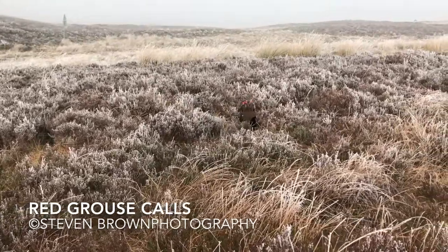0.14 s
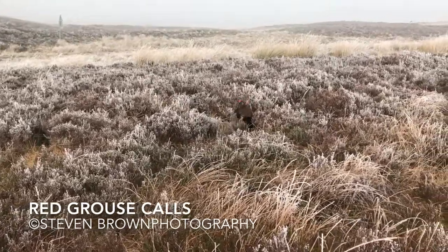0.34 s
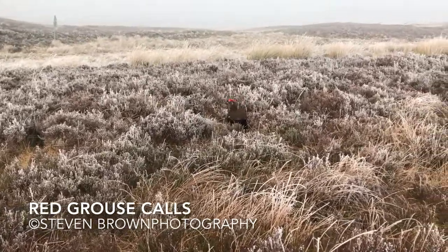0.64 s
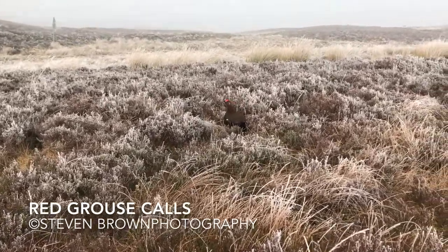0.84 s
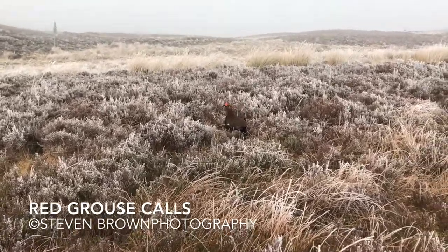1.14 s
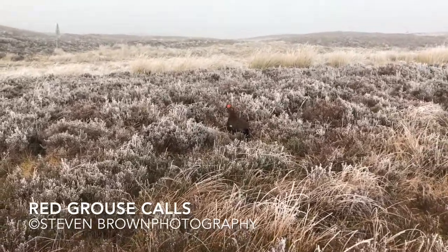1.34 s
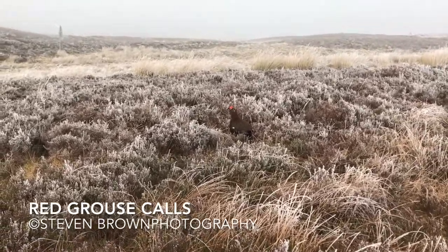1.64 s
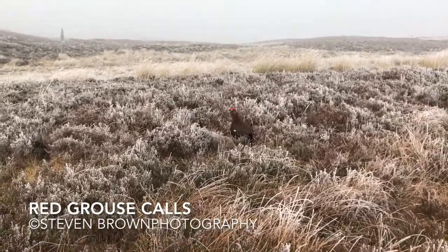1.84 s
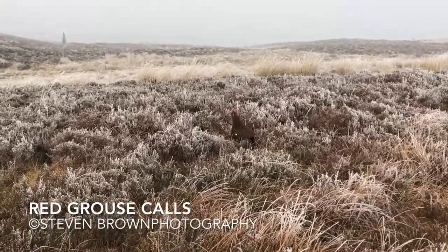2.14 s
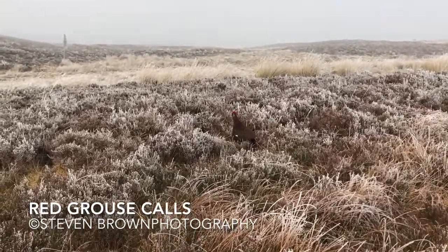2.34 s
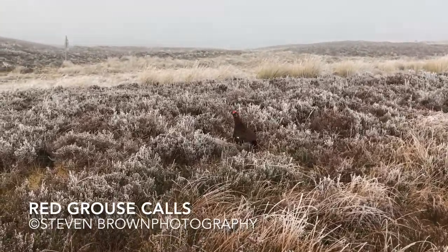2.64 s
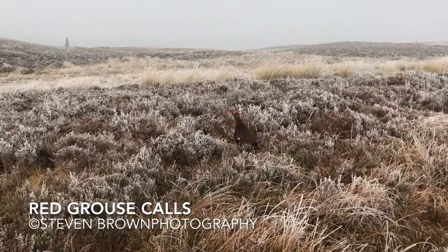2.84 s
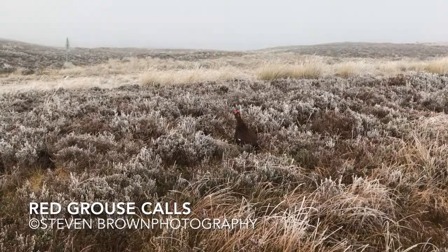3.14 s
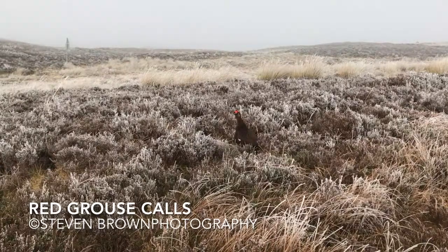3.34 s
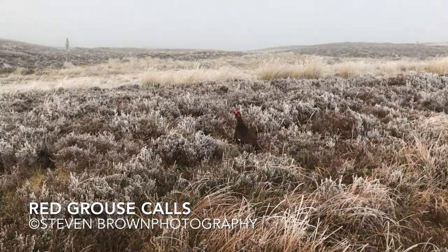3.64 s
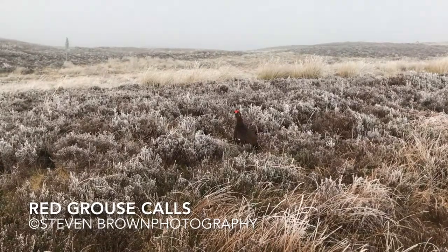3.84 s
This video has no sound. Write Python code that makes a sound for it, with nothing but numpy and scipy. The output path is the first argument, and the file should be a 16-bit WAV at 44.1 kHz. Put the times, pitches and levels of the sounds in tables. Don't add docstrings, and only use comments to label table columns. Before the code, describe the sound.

Harsh grouse croaks with low growls speed up into a rapid rattle, over faint moorland wind.

```python
import sys
import numpy as np
from scipy import signal
from scipy.fft import rfft, irfft, next_fast_len
from scipy.io import wavfile
from scipy.ndimage import uniform_filter1d, map_coordinates

SR = 44100
rng = np.random.default_rng(int(sys.argv[2]) if len(sys.argv) > 2 else 0)


def unload_audio(sound):
    columns = np.transpose(np.atleast_2d(sound))
    steps = np.round(np.clip(columns, -1, 1) * 32767)
    wavfile.write(sys.argv[1], SR, steps.astype(np.int16))


def gain_from_decibels(decibels):
    exponent = np.asarray(decibels, float) / 20
    return 10 ** exponent


N = 176400

# time_s, level_db
WIND = [(0, -47), (.06, -45.5), (.14, -49), (.28, -53), (.42, -62.5), (.5, -64.5), (.86, -60.5),
        (1.05, -45.5), (1.2, -67), (1.38, -76.5), (1.5, -63.5), (1.9, -58), (1.98, -81), (2.1, -52.5),
        (2.4, -68), (3.34, -60), (3.7, -46.5), (4, -67)]
# middle_s, level_db, pitch_hz, phase_cycles
THUMPS = [(.01, -38, 50.6, 0.48), (0.09, -45, 46.7, 0.47), (0.147, -40.5, 83.6, 0.017), (.2, -47, 68, .1),
          (0.254, -50.5, 107, .02), (.263, -41, 59.6, 0.47), (1.068, -41, 204, 0.017),
          (1.485, -54.5, 90, .02), (3.58, -48, 146, 0.023), (3.642, -42, 108, 0.67),
          (3.675, -39.5, 75, 0.67), (3.701, -42.5, 119, .5), (3.724, -36, 170, 0.13),
          (3.742, -35, 108, 0.49), (3.7585, -32.5, 182, .01), (3.801, -37.5, 90, .5),
          (3.82, -39, 46.7, 0.59), (3.904, -49.5, 97.5, .02)]
# pitch_hz, level_db
RUMBLE = [(15, -36), (30, -15), (55, 4.5), (110, -8), (200, -20), (350, -37), (500, -100), (900, -120)]
# pitch_hz, level_db
HISS = [(300, -3), (800, -9), (1500, -14.5), (3000, -17), (6000, -20), (10500, -22.5), (15500, -21.5)]
# time_s, extra_level_db
RUSTLES = [
    (0.039, 6.5),
    (0.481, 5),
    (.7, 4),
]
# start_s, length_s, upper_level_db, lower_level_db, pitch_factor
FAR_CALLS = [(0.03, 0.0085, -76, -60, .98), (.079, 0.016, -74, -66.5, 0.92), (0.134, 0.022, -71, -64, 0.92),
             (0.202, 0.018, -69.5, -61, 0.94), (0.271, 0.017, -69, -60.5, 0.95),
             (.34, .03, -66.5, -59.5, 0.97), (0.433, 0.026, -68.5, -58, 0.98),
             (0.562, 0.034, -65.5, -58, 1), (.726, 0.035, -63, -57.5, 1.01),
             (1.143, .047, -69, -69.5, 0.99), (1.431, 0.07, -65, -74, .98), (1.744, 0.058, -63, -68, 0.98),
             (2.025, 0.055, -66, -64.5, 0.954), (2.586, .041, -67.5, -70, 0.97),
             (2.928, 0.031, -73, -71, 0.82), (3.562, 0.087, -76, -66, 0.94), (3.857, 0.021, -70, -66, 0.68),
             (3.914, 0.084, -62.5, -66.5, 0.92)]
FAR_WIDTHS = [90, 133, 200]
# start_s, length_s, level_db, pulse_rate_hz
GROWLS = [
    (0.331, 0.036, -54, 121.4),
    (0.388, 0.053, -57, 115.5),
    (0.452, 0.076, -56.5, 112),
    (0.523, 0.21, -57.5, 108.6),
    (0.967, 0.21, -53.5, 110.5),
    (1.396, .1, -54.5, 110.3),
    (1.705, 0.084, -54, 111.5),
    (1.968, 0.058, -49, 108.6),
    (2.191, 0.071, -60.5, 99.8),
]
# pitch_hz, level_db, width_hz
THROAT = [(303.7, 5, 290), (696, 4, 85), (1043, 1, 83), (1400, -6, 250), (2150, -30, 530)]
# start_s (first full pulse), peak_level_db
NOTES = [(0.924, -36), (1.347, -29.5), (1.669, -27), (1.934, -26.5), (2.145, -23.5), (2.305, -26.5),
         (2.427, -28), (2.537, -27.5), (2.639, -28.5), (2.735, -29.5), (2.823, -28.5), (2.903, -30),
         (2.976, -32.5), (3.046, -32.5), (3.112, -32), (3.175, -33), (3.234, -35), (3.29, -37.5),
         (3.345, -39.5), (3.399, -42), (3.453, -43), (3.507, -54), (3.558, -50.5), (3.612, -53.5),
         (3.665, -50.5), (3.724, -50)]
# time_s, pulse_rate_hz, beak_opening (0-1), note_length_s,
# lead_in_level_db, first_pulse_held_back_db
POSTURE = [(.95, 131.3, 0.17, 0.03, -15, 2.5), (1.355, 152, 0.09, 0.025, -10.5, 4),
           (1.653, 165, 0.09, 0.026, -11.5, 3), (1.923, 168.1, 0.04, 0.028, -12.5, 0.5),
           (2.145, 183.3, 0.04, 0.036, -25, 7.5), (2.298, 171.5, 0.08, 0.034, -14.5, 2),
           (2.424, 173.8, 0.28, 0.033, -19.5, 2), (2.547, 182, 0.36, 0.033, -18.5, 1),
           (2.65, 178.9, 0.56, 0.032, -13, 0.5), (2.845, 180.9, 0.69, 0.031, -14, 2.5),
           (2.999, 192, 0.94, 0.03, -14.5, 1), (3.216, 191, 1, 0.029, -12, 4),
           (3.354, 170, 1, 0.018, -18, 2.5), (3.444, 170, 0.98, 0.017, -20, 3),
           (3.518, 131, 0.96, 0.01, -43, 1), (3.558, 135, 1, 0.018, -32, -1),
           (3.609, 132.7, 1, 0.0094, -22, 1), (3.73, 170, 0.94, 0.0055, -12.5, 3.5)]
# shut_pitch_hz, open_pitch_hz, shut_level_db, open_level_db, width_hz, open_glide_hz_per_s
WINDPIPE = [(170, 150, -30.5, -24, 63, -3), (321, 337, -21.5, -13.5, 76.5, 0), (900, 867, 2, 8, 119, -3500),
            (1288, 1380, 0, -5, 146, 2006), (1444, 1600, -20, -13.5, 144, 1000),
            (2100, 1872, -23, 2.5, 120, -2500), (3435, 2346, -21, -0.5, 121, -4000),
            (2390, 3160, -25, -19, 250, -3000), (3550, 4040, -41, -15.5, 187, -2500),
            (5230, 6360, -22, -39, 360, 0)]
# time_s, tone_factor, top_tone_factor, top_tone_level_db
NECK = [(.92, 0.82, 0.77, 5), (1.35, 0.86, .845, 4.5), (1.67, 0.92, 0.87, 3.5), (1.93, 0.95, 0.91, -4),
        (2.2, 0.94, 0.98, -12)]
# time_s, level_db
EFFORT = [(.92, -1.5), (1.93, 0.3), (2.15, 4), (2.31, 5), (2.43, 1), (2.64, 0.4), (3.12, 1), (3.24, -0.5),
          (3.3, -10.5), (3.45, -9)]
# pitch_hz, level_db
RASP = [(1800, -59), (3000, 5), (5000, 10), (7000, 1.5), (12000, 0.5), (16000, -3.5)]


def unit(x):
    return x / np.sqrt(np.mean(x ** 2) + 1e-20)


def wobble(rate):
    knots = rng.standard_normal(int(N * rate / SR) + 4)
    return map_coordinates(knots, [np.arange(N) * rate / SR])


def coloured(points):
    f, db = np.transpose(points)
    hz = np.fft.rfftfreq(N, 1 / SR) + 1
    colour = gain_from_decibels(np.interp(np.log(hz), np.log(f), db))
    return unit(irfft(rfft(rng.standard_normal(N)) * colour, N))


def read(table, times):
    at, *columns = np.transpose(table)
    return [np.interp(times, at, c) for c in columns]


def column(x):
    return x.reshape(-1, 1)


def ring(s, hz, db, wide_hz, cycles):
    at = np.ceil(s * SR).astype(int)[:, None] + np.arange(900)
    t = (at / SR - s[:, None])[:, None]
    hz, db, wide_hz = (np.asarray(v)[..., None] for v in (hz, db, wide_hz))
    flip = (-1.) ** np.arange(hz.shape[-2])[:, None]
    softest_s = 0.0003
    swell = (1 - np.exp(-t / (cycles / hz + softest_s))) ** 2
    shape = gain_from_decibels(db) * np.exp(-np.pi * np.abs(wide_hz) * t) * swell
    tones = flip * shape * np.sin(2 * np.pi * hz * t)
    return np.bincount(at.ravel(), tones.sum(1).ravel(), N + SR)[:N]


def echoes(x, t60):
    t = np.arange(SR // 2) / SR
    tail = rng.standard_normal(len(t)) * gain_from_decibels(-60 * t / t60)
    return signal.fftconvolve(x, tail / np.linalg.norm(tail))[:N]


def wind():
    t = np.arange(N) / SR
    lumps_db = 5.9 * wobble(15) + 3.1 * wobble(40)
    buffet = gain_from_decibels(read(WIND, t)[0]) * unit(gain_from_decibels(lumps_db) * coloured(RUMBLE))
    for s, db, hz, phase in THUMPS:
        u = (t - s) * hz
        wave = np.cos(2 * np.pi * (u + phase)) + 0.23 * np.cos(2 * np.pi * 2 * (u + phase))
        buffet = buffet - gain_from_decibels(db) * wave * np.exp(-(u / np.where(u < 0, 0.65, 0.75)) ** 2)
    rustle_db = sum(db * np.exp(-((t - s) / 0.06) ** 2) for s, db in RUSTLES)
    hiss_db = -76 + rustle_db + 0.69 * wobble(2.27)
    return buffet * np.minimum(t / 0.0017, 1) + gain_from_decibels(hiss_db) * coloured(HISS)


def far_birds():
    pulse_rate_hz, low_hz, high_hz, arch_rise, roughness = 190.3, 797, 1880, 0.16, 0.1
    s, length, high_db, low_db, pitch = (c[:, None] for c in np.transpose(FAR_CALLS))
    chance = rng.standard_normal((len(s), 2, 24))
    t = (np.arange(24) + 0.5 + roughness * chance[:, 0]) / pulse_rate_hz
    on = t < length
    arch = np.sin(np.pi * np.clip(t / length, 0.02, 0.98))
    bend = arch ** (9 * length)
    swell_db = 20 * np.log10(arch) * 0.31 + 0.57 * chance[:, 1]
    lower_hz = low_hz * (1.05 - 0.16 * t / length)
    upper_hz = pitch * high_hz * (1 + arch_rise * bend)
    top_hz = 1.13 * pitch * high_hz * (1 + 1.15 * arch_rise * bend)
    hz = np.stack([lower_hz, upper_hz, top_hz], -1)
    db = np.stack([low_db + swell_db, high_db + swell_db, high_db + swell_db - 8], -1) + 9.5
    calls = ring((s + t)[on], hz[on], db[on], FAR_WIDTHS, cycles=2.25)
    return calls + gain_from_decibels(-9.5) * echoes(calls, t60=0.15) + gain_from_decibels(-30) * echoes(calls, t60=0.6)


def growls():
    sag_hz_per_s, rise_s, end_s, fall_db, scatter_db = 65, 0.01, 0.013, 6.5, 2
    s, length, db, rate = (c[:, None] for c in np.transpose(GROWLS))
    chance = rng.standard_normal((len(s), 2, 24))
    u = np.arange(24) / rate
    t = u + sag_hz_per_s / rate * u ** 2 / 2 + 0.0001 * chance[:, 0]
    edge_db = -14 * np.maximum(1 - t / rise_s, 0) - 9 * np.maximum(1 - (length - t) / end_s, 0)
    level_db = db + edge_db - fall_db * np.abs(t / 0.057) ** 0.5 + scatter_db * chance[:, 1]
    on = t < length
    hz, tone_db, wide_hz = np.transpose(THROAT)
    tone_db = tone_db - 12 * (hz < 900) * (t / length)[on][:, None] ** 2
    return -ring((s + t)[on], hz[None], level_db[on][:, None] + tone_db, wide_hz, cycles=0.078)


def notes():
    s, peak_db = np.transpose(NOTES)
    rate, beak, length, lead_db, held_db = (c[:, None] for c in read(POSTURE, s))
    k = np.arange(-2, 9)

    def each_pulse(x):
        return np.repeat(x, len(k))[:, None]

    chance = rng.standard_normal((len(s), 2, len(k)))
    slack = 0.0308
    gaps = (1 + slack * (k - 2.3) ** 2 + 0.019 * chance[:, 0]) / rate
    t = np.cumsum(gaps, 1) - gaps[:, :3].sum(1, keepdims=True)

    step_db, fall_db, cut_db = 6, 6, 36.5
    fade_db = -step_db * (k > 1) * (0.16 + 0.67 * beak) - fall_db * t / length
    fade_db = fade_db - cut_db * np.abs(t / length) ** 7
    fade_db = fade_db - held_db * ((k == 0) + 0.14 * (k == 1))
    loss_db = np.where(k < 0, lead_db * np.where(k < -1, 2.6, 1), fade_db) + 0.9 * chance[:, 1]

    opens_per_s = 6.9
    opening = beak + opens_per_s * t * np.minimum(1.5 * beak, 1 - beak) * 4
    opening = column(np.clip(opening, 0, 1))
    shut_hz, open_hz, shut_db, open_db, wide_hz, glide = np.transpose(WINDPIPE)
    neck, top, top_db = (each_pulse(c) for c in read(NECK, s))
    neck_factor = np.where(shut_hz > 5000, top, np.where(shut_hz > 2500, neck, np.sqrt(neck)))
    hz = shut_hz + (open_hz - shut_hz) * opening + glide * opening * column(np.clip(t, 0, 0.04))
    hz = hz * neck_factor

    mouth_shut_hz, mouth_open_hz, mouth_rise_hz, mouth_rise_s = 3400, 5200, 1110, 0.013
    mouth_db, mouth_wide_hz = -10, 287
    rise = np.minimum(0.14 + 7 * beak, 1 - 0.053 * beak) * (1 - np.exp(-t / mouth_rise_s))
    mouth_hz = mouth_shut_hz + (mouth_open_hz - mouth_shut_hz) * beak ** 2 + mouth_rise_hz * rise
    hz = np.hstack([hz, column(np.maximum(mouth_hz, 2000)) * neck])
    tone_db = shut_db + (open_db - shut_db) * opening ** 2 + top_db * (shut_hz > 5000)
    tone_db = np.hstack([tone_db, mouth_db - 6 * (1 - opening) - 90 * (1 - top)])

    dulls_db, damps_db_per_s = 0.78, 128
    dull_db = dulls_db * np.minimum(peak_db[:, None] + 33, 0) * 1.2 - 15 * (k < 0)
    dull_db = dull_db + 0.6 * loss_db * np.maximum(1 - 3 * beak, 0)
    tone_db = tone_db + (hz > 1600) * column(dull_db)
    tone_db = tone_db - (hz < 1000) * damps_db_per_s * column(np.maximum(t, 0))

    first_dull_db, late_dull_db = 6.5, 2.5
    upper_dull_db = first_dull_db * (k < 1) + late_dull_db * np.maximum(k - 1, 0)
    tone_db = tone_db - (hz > 2600) * np.tile(upper_dull_db, len(s))[:, None]
    tone_db = tone_db + (hz > 2600) * each_pulse(read(EFFORT, s)[0])
    tone_db = tone_db + (hz > 1150) * (hz < 1900) * each_pulse(np.minimum(peak_db + 40, 0)) * 0.6

    pitch_scatter, scatter_db = 0.01, 1.3
    scatter = rng.standard_normal((2,) + hz.shape)
    db = column(peak_db[:, None] + loss_db) + tone_db + scatter_db * scatter[1] + 1.5
    hz = hz * (1 + pitch_scatter * scatter[0])
    return ring((s[:, None] + t).ravel(), hz, db, np.append(wide_hz, mouth_wide_hz), cycles=0.28)


def rasp(voice):
    strength = uniform_filter1d(np.abs(np.diff(voice, prepend=0)), size=60) * 8
    return gain_from_decibels(-37) * strength * coloured(RASP)


def scene():
    voice = notes()
    bird = voice + rasp(voice) + growls()
    return (bird + gain_from_decibels(-25.5) * echoes(bird, t60=0.13) + far_birds() + wind())[None]


def roll_off(x):
    return signal.sosfilt(signal.butter(12, 15710, fs=SR, output="sos"), x)


def record(dry):
    top_hz = 15750
    m = next_fast_len(N + SR // 2)
    kept = np.fft.rfftfreq(m, 1 / SR) < top_hz
    mix = irfft(rfft(dry, m) * kept, m)[:, :N]
    return roll_off(mix)


dry = scene()
out = record(dry)
unload_audio(out)
```